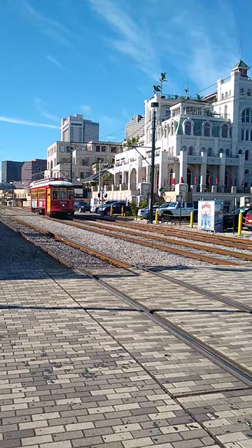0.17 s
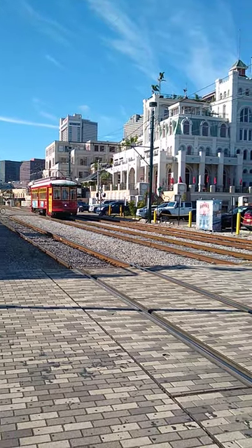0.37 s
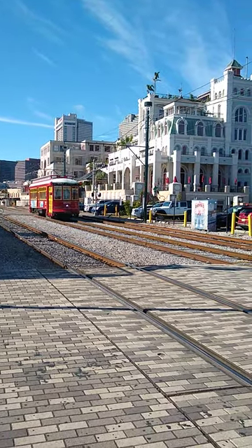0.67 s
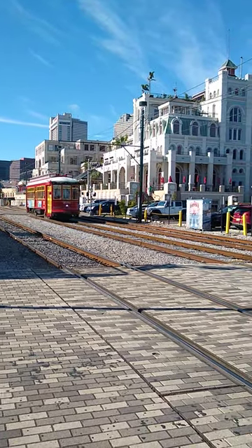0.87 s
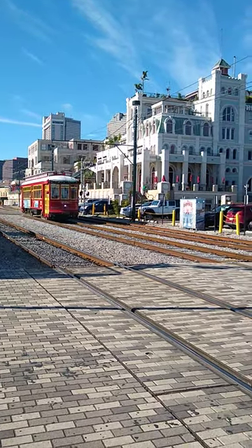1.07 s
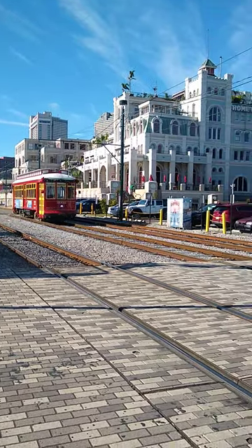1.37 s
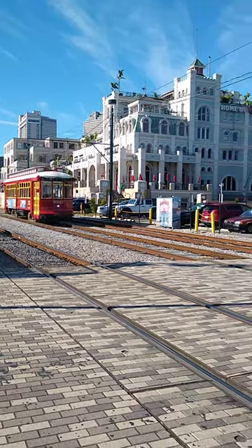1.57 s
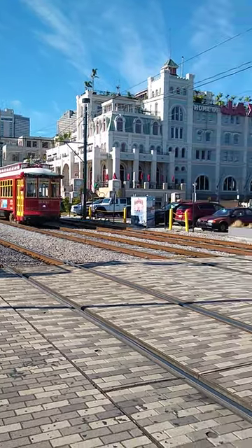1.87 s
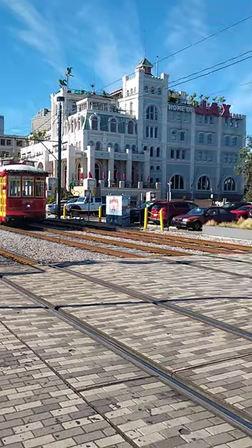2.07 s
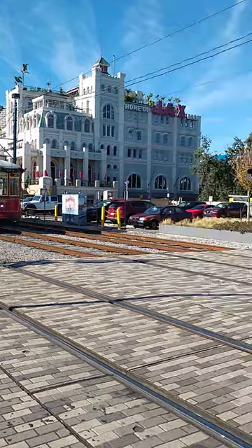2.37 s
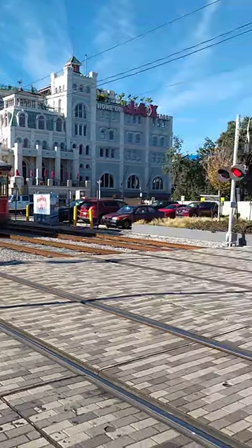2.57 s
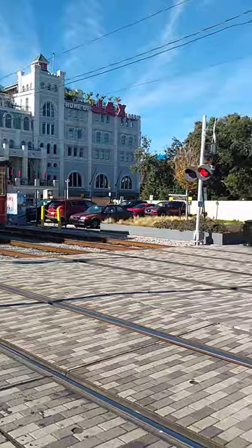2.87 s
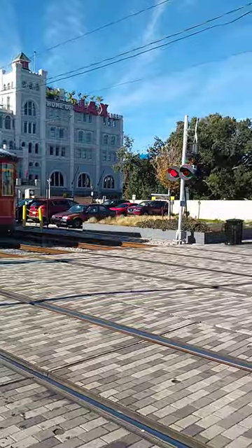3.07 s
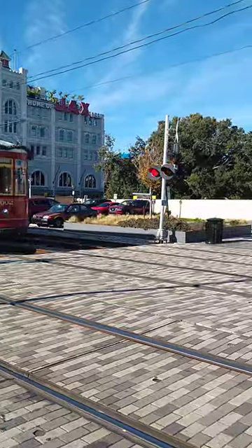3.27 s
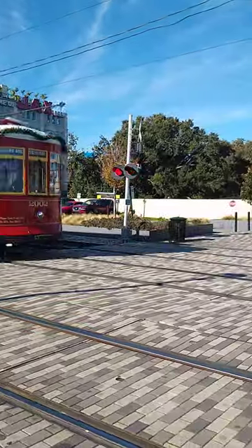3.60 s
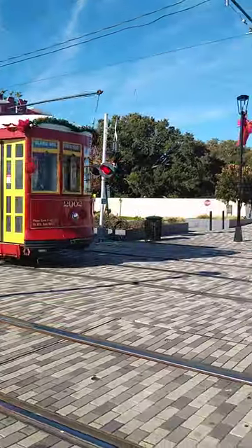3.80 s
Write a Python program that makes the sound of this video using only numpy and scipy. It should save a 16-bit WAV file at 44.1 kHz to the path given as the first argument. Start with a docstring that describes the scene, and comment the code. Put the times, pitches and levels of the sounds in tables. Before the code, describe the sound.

An approaching streetcar rolls and knocks over rail joints, its motor whining, amid gusty wind.

```python
"""At a street crossing, a streetcar rolls up and draws level, over the steady wash of the street.
Its wheels rumble on the rails, knock over joints, groan and briefly ring; loose metal clatters.
Its gears hum, its body drones, its motor whines and the rails sing ahead of it.
Wind buffets the two microphone openings (ports) of a hand-held camera, which gets one dull bump.
A thin hiss of air comes and goes."""
import sys
import numpy as np
from scipy import signal
from scipy.fft import rfft, irfft
from scipy.io import wavfile
from scipy.ndimage import uniform_filter1d, minimum_filter1d

SR = 44100
rng = np.random.default_rng(int(sys.argv[2]) if len(sys.argv) > 2 else 0)


def master(y):
    """Save y as 16-bit WAV."""
    cut = np.clip(np.atleast_2d(y).T, -1, 1)
    pcm = np.round(cut * 32767)  # scale
    wavfile.write(sys.argv[1], SR, pcm.astype(np.int16))


N = 173754
T = np.arange(N) / SR
HZ = np.fft.rfftfreq(N, 1 / SR)

# how the rolling grows as the car nears (time [s], level [dB])
APPROACH = [(0, -21.5), (1.0, -19), (1.7, -14.5), (2.2, -11.5), (2.7, -5.5), (3.12, -4.5), (3.4, -1),
            (3.94, 3)]
# sound of wheels on rails, close by (frequency [Hz], level [dB per Hz])
ROLLING = [(50, -82), (110, -64.5), (190, -48.5), (255, -44), (330, -40.5), (400, -47.5), (470, -46.5),
           (600, -45), (670, -51), (800, -48.5), (950, -58), (1270, -59.5), (1400, -61.5), (1600, -60),
           (2050, -67), (2550, -69.5), (2900, -77), (3350, -82), (3800, -78.5), (4400, -76), (5000, -87),
           (6800, -96.5), (9000, -101), (13000, -94.5), (15500, -99)]


def amp(db):
    """Turns decibels into a number to multiply by."""
    return 10 ** (np.asarray(db) / 20)


def unit(x):
    """Scales a signal to an average size (rms) of 1."""
    return x / np.sqrt(np.mean(x ** 2) + 1e-20)


def read(points):
    """Joins a table's points into a smooth line over frequency, spaced by octaves."""
    hz, value = np.transpose(points)
    return np.interp(np.log(HZ + 1), np.log(hz + 1), value)


def curve(points, column=1):
    """Follows one column of a table over time."""
    rows = np.array(points)
    return np.interp(T, rows[:, 0], rows[:, column])


def noise(db_per_hz):
    """Two unrelated noises with the given level at each frequency."""
    return irfft(rfft(rng.standard_normal((2, N))) * amp(db_per_hz), N) * np.sqrt(SR / 2)


def wander(rate_hz):
    """A random drift of size 1, up to about the given rate."""
    spectrum = rfft(rng.standard_normal(N))
    return unit(irfft(spectrum * HZ / (HZ + 3) / (1 + (HZ / rate_hz) ** 4), N))


def patchy(x, depth_db):
    """Lets random patches of low and high sound swell and sink."""
    slices = signal.stft(x, nperseg=512, noverlap=384)[2]
    patches = rng.standard_normal(slices.shape[:0:-1])  # time by frequency
    patches = uniform_filter1d(patches, size=16, axis=0)
    patches = unit(uniform_filter1d(patches, size=4, axis=1))
    return signal.istft(slices * amp(depth_db * patches.T), nperseg=512, noverlap=384)[1][:, :N]


def ring(hz, width_hz):
    """Noise of size 1 gathered around one pitch, like something rubbed until it rings."""
    return unit(noise(-20 * np.log10(1 + ((HZ - hz) / width_hz * 2) ** 2)))


def tone(hz, waver, flicker_db):
    """A tone of size 1 whose level flickers and whose pitch wavers by the given fraction."""
    phase = 2 * np.pi * np.cumsum(hz * (1 + waver * wander(rate_hz=20.2))) / SR
    return unit(amp(flicker_db * wander(rate_hz=19)) * np.sin(phase))


def blow(start, decay_s, attack_s):
    """The shape of a hit: a quick rise, then a fade."""
    age = np.maximum(T - start, 0)
    return np.minimum(age / attack_s, 1) * np.exp(-age / decay_s)


def swells(rows):
    """One smooth rise and fall for each row (start [s], length [s], level [dB])."""
    return sum(amp(db) * np.sin(np.pi * np.clip((T - start) / length, 0, 1)) for start, length, db in rows)


def street():
    """The street and the far track blend into a wash that slowly grows."""
    # colour of the wash (frequency [Hz], level [dB per Hz])
    colour = [(50, -77), (110, -63.5), (200, -59), (270, -52.5), (420, -73.5), (570, -70.5), (680, -71),
              (800, -66), (1000, -73.5), (1270, -68), (1450, -69), (1700, -71), (2050, -68.5), (2900, -88),
              (3350, -98), (3900, -84.5), (5000, -98), (7000, -106), (9500, -107), (12000, -105),
              (15500, -114)]
    # its rise (time [s], level [dB])
    loudness = [(0, -3), (.8, -1), (1.2, 1), (2.0, 1), (3.94, 5)]
    return patchy(noise(read(colour)), depth_db=2.0) * amp(curve(loudness))


def rolling(near_db):
    """Wheels rumble and judder along the rails."""
    judder_db = 1.5 * wander(rate_hz=38)
    return patchy(noise(read(ROLLING)), depth_db=1.46) * amp(near_db + judder_db - 2.5)


def gear_hum(near_db):
    """The gears rub out a rough hum at several pitches."""
    # gear notes (pitch [Hz], width [Hz], level when close [dB], share of the approach followed [0-1])
    notes = [(245, 42, -31.5, 0.6), (326, 55, -31, 0.54), (574, 45, -38, 0.68), (471, 53, -30.5, 1),
             (1020, 38, -43, 1)]
    return sum(ring(hz, width) * amp(db + share * near_db) for hz, width, db, share in notes)


def body_drone(near_db):
    """The car's body drones, higher and louder as it comes close."""
    # note of the body (time [s], pitch [Hz])
    pitch = [(0, 261.5), (1.9, 258), (2.5, 284), (3.35, 271.5), (3.6, 293.5), (3.94, 298)]
    return tone(curve(pitch), waver=0.055, flicker_db=2) * amp(-26 + 0.61 * near_db)


def singing_rails(near_db):
    """The rails sing ahead of the car."""
    # rail notes (pitch [Hz], level when close [dB], share of the approach followed [0-1])
    notes = [(799, -46, 0.25), (1254, -45.5, 0.17), (1290, -47.5, 0.098), (1492, -44.5, 0.51),
             (1680, -47, 0.1)]
    return sum(tone(hz, waver=0.009, flicker_db=4) * amp(db + share * near_db) for hz, db, share in notes)


def wind():
    """Lumpy wind and single gusts push the two ports in mostly opposite directions."""
    # strength of the wind (time [s], level [dB])
    strength = [(0, -16), (.2, -4), (.4, -11), (.66, -6.5), (.7, -24), (.75, -9.5), (.82, -24),
                (.96, -14.5), (1.3, -25.5), (1.42, -39), (1.64, -36), (1.75, -22), (1.95, -17.5),
                (2.24, -11.5), (2.5, -17), (2.65, -26), (3.0, -24), (3.4, -30), (3.66, -15), (3.94, -25)]
    # its low rumble (frequency [Hz], level [dB per Hz])
    rumble_colour = [(20, -60), (45, -40.5), (80, -39), (130, -34.5), (200, -42), (300, -58), (400, -62),
                     (600, -88), (1200, -110.5)]
    # single gusts (start [s], length [s], level [dB])
    gusts = [(.025, .025, -8), (0.172, 0.035, -4), (0.208, 0.08, -1), (0.29, .03, -6), (0.49, 0.06, -7),
             (2.391, 0.041, -4)]
    # their brighter sound (frequency [Hz], level [dB per Hz])
    gust_colour = [(20, -66), (45, -55), (80, -43), (130, -37), (200, -38), (330, -45), (450, -53),
                   (600, -65), (900, -81), (1500, -106)]
    # how closely one port mirrors the other (frequency [Hz], likeness [0-1])
    mirroring = [(90, .985), (170, .95), (280, .85), (450, .7)]
    force = amp(curve(strength) + 1.5 * wander(rate_hz=22.2) + 5.5)
    mirrored, common = rfft(noise(read(rumble_colour)) * force + noise(read(gust_colour)) * swells(gusts))
    likeness = np.clip(read(mirroring), 0, 1)
    mirrored = mirrored * np.sqrt((1 + likeness) / 2) * np.array([[1], [-1]])
    common = common * np.sqrt((1 - likeness) / 2)
    return irfft(mirrored + common, N) * amp([[0.93], [-0.93]])  # leans to the left


def hiss():
    """A thin, fluttering hiss of air comes and goes, with two short puffs."""
    # strength of the hiss (time [s], upper level [dB], lower level [dB])
    loudness = [(0, -26, -29), (.06, -16.5, -13), (.18, -9, -9), (.25, -17, -11), (.34, -10, -13),
                (.42, -11, -5), (.48, -27, -28), (1.55, -27, -57), (1.66, -11.5, -10), (1.78, 2.5, 1),
                (1.89, -2.5, -6.5), (2.03, 0.5, -1.5), (2.14, 1, -5), (2.26, 1, 5), (2.38, -15, -10),
                (2.67, -16, -21.5), (3.2, -12.5, -6.5), (3.94, -9, -27)]
    # upper hiss (frequency [Hz], level [dB per Hz])
    upper_colour = [(3000, -105), (7000, -120), (9800, -88.5), (10800, -84.5), (14000, -84), (15500, -87.5)]
    # lower hiss (frequency [Hz], level [dB per Hz])
    lower_colour = [(1500, -100), (3000, -82), (4000, -82), (4800, -84.5), (5500, -83.5), (6500, -86),
                    (8200, -87), (11000, -104), (15000, -108)]
    # puffs of air (start [s], length [s], level [dB])
    puffs = [(2.684, 0.18, -6.5), (2.961, 0.11, -5.5)]
    upper = noise(read(upper_colour)) * (amp(curve(loudness, column=1)) + swells(puffs))
    lower = noise(read(lower_colour)) * (amp(curve(loudness, column=2)) + swells(puffs))
    return patchy(upper + lower, depth_db=2.5) * amp(0.64 * wander(rate_hz=22))


def wind_thumps():
    """Each swirl of air gives one push, opposite at the two ports, that swings back as it leaks away."""
    # swirls (time [s], level [dB], half-width [s])
    swirls = [(.0475, 0, .0011), (.104, -4, .0008), (.1125, 4, .0014), (.184, -4, .0011), (.234, 1, .0012),
              (.2505, 1, .0009), (.279, -7, .0008), (.5, -2.5, .0008), (.518, -6, .001), (.533, 3, .0012),
              (.673, -5, .0015), (.741, -8, .0016)]
    push = sum(amp(db) * np.exp(-.5 * ((T - time) / width) ** 2) for time, db, width in swirls)
    swing = signal.sosfilt(signal.butter(3, 110, "high", fs=SR, output="sos"), push)
    return swing * np.array([[1], [-amp(-2.5)]])


def whistle():
    """The hissing air briefly whistles."""
    # whistles (start [s], length [s], level [dB])
    whistles = [(.33, 0.17, -68), (1.69, 0.042, -53), (1.76, 0.052, -48)]
    return ring(hz=5400, width_hz=220) * swells(whistles)


def bump():
    """One short, dull knock on the camera's body."""
    pitch_hz, width_hz = 616, 670
    push = rng.standard_normal((2, N)) * blow(start=0.536, decay_s=0.007, attack_s=0.00034)
    body = 1 / (1 + ((HZ - pitch_hz) / width_hz * 2) ** 4)
    return irfft(rfft(push) * body, N) * np.sqrt(SR / 2 / width_hz) * amp(-18)


def motor_whine():
    """The motor whines in surges at a nearly steady pitch."""
    # motor note (time [s], pitch [Hz], level [dB])
    note = [(0, 552, -77), (1.3, 553, -49.5), (1.75, 566, -38.5), (2.05, 550, -40), (2.33, 558, -32.5),
            (2.5, 562, -43), (3.0, 558, -41), (3.21, 567, -25.5), (3.35, 568, -46), (3.94, 565, -38)]
    return tone(curve(note, column=1), waver=0.005, flicker_db=1.8) * amp(curve(note, column=2))


def joint_knocks(near_db):
    """Wheels hit rail joints: each knock is a gritty burst plus a low note from the car's body."""
    # knocks (start [s], strength [dB], fade time [s], body pitch [Hz])
    hits = [(1.732, -4, .018, 322), (1.853, 2, .02, 248), (1.949, 3, 0.018, 250), (2.109, -1.5, 0.024, 284),
            (2.225, 3.5, 0.0086, 286), (2.346, -1.5, 0.024, 251), (2.48, 1, 0.018, 305),
            (2.681, 4, 0.013, 266), (2.833, -0.5, 0.028, 288), (2.99, -2.5, 0.025, 255),
            (3.184, -0.5, 0.034, 275), (3.392, 2, 0.045, 261), (3.45, -4, 0.027, 283),
            (3.519, 2, 0.027, 292.5), (3.598, -1, 0.037, 290.2), (3.718, 0.5, 0.033, 320)]
    grit = noise(read(ROLLING) - 10 * np.log10(1 + (HZ / 900) ** 2) - 3.5)  # duller than the rolling
    knocks = np.zeros((2, N))
    for start, db, decay, hz in hits:
        force = amp(db + 0.5 * near_db) * blow(start, decay, attack_s=0.0032)
        knocks += grit * force
        knocks[0] += amp(-12.5) * force * np.sin(2 * np.pi * hz * (T - start))
    return knocks


def clatter():
    """Loose metal rattles on the frame that holds the wheels."""
    # rattles (start [s], level [dB per Hz], fade time [s])
    hits = [(2.25, -65, 0.045), (2.669, -54.5, 0.016), (2.704, -59, 0.016), (2.721, -58, 0.011),
            (2.838, -60, .02), (3.19, -59, .025), (3.556, -55, .012), (3.735, -59, 0.05)]
    # colour of the metal (frequency [Hz], level [dB])
    colour = [(300, -14), (700, -2), (1200, -.5), (1700, -4), (2200, -20), (3000, -34), (8000, -58)]
    force = sum(amp(db) * blow(start, decay, attack_s=0.0045) for start, db, decay in hits)
    return noise(read(colour)) * force


def ticks():
    """A few faint, sharp ticks."""
    # ticks (start [s], level [dB per Hz])
    hits = [(2.523, -83), (2.570, -82), (3.192, -83)]
    return noise(0) * sum(amp(db) * blow(start, decay_s=0.0018, attack_s=0.00028) for start, db in hits)


def wheel_groan():
    """The wheels groan once on a wavering note."""
    return tone(hz=463, waver=0.012, flicker_db=1.5) * swells([(3.2, 0.26, -27.5)])


def wheel_ring():
    """Rough contact with the rail makes a wheel ring, high and brief."""
    return ring(hz=3740, width_hz=110) * swells([(3.495, 0.07, -49)])


def ports(pair):
    """Makes left and right from a pair: both ports share row 0, and row 1 makes them differ."""
    # how alike the ports sound (frequency [Hz], likeness [0-1])
    alike = [(100, 1), (300, 0.99), (500, 0.81), (700, .99), (1150, 1), (1500, 0.85), (2200, 0.99),
             (2600, 0.76), (3200, 0.31), (4000, 0.73), (4280, 1), (4600, 1), (4900, 0.22), (5500, 1),
             (6000, 0.83), (6500, 0.39), (15000, 0.43)]
    # how far the left wave runs ahead (frequency [Hz], lead [radians])
    lead = [(100, 0), (250, .05), (380, .55), (500, -.25), (1100, 0), (1400, -.3), (1750, -1.1), (2100, -3),
            (2650, -3.6), (3300, -5.3), (3750, -8.2), (4250, -9.35), (4600, -9.48), (4800, -9.8),
            (5000, -12.6), (6100, -12.5), (6500, -9.4), (7000, -9.4), (14400, 9.4), (15500, 11)]
    # which side is louder (frequency [Hz], left minus right [dB])
    balance = [(160, 0.5), (270, -2), (440, 5.5), (700, 0), (1250, 0.5), (2000, -2), (3300, 1.5),
               (5400, -2.5), (8800, 12), (11000, 7.5), (14500, 1.5)]
    likeness = np.clip(read(alike), 0, 1)
    shared = rfft(pair[0]) * np.sqrt((1 + likeness) / 2)
    apart = rfft(pair[1]) * np.sqrt((1 - likeness) / 2)
    turn = np.exp(1j * np.interp(HZ, *np.transpose(lead)))
    lean = amp(read(balance))
    left, right = (shared + apart) * lean, (shared - apart) / turn
    return irfft(np.array([left, right]) * np.sqrt(2 / (1 + lean ** 2)), N)


def scene():
    """The car, the street and the small sounds pass through the ports, with the wind on top."""
    near_db = curve(APPROACH)
    car = rolling(near_db) + gear_hum(near_db) + joint_knocks(near_db) + clatter() + wheel_ring()
    # the clear tones go in the shared row, so they come from one direction
    car[0] += body_drone(near_db) + motor_whine() + wheel_groan() + singing_rails(near_db)
    return ports(car + street() + hiss() + whistle() + ticks() + bump()) + wind() + wind_thumps()


def record(dry):
    """Cuts the deepest bass, gently turns down the loudest peaks and cuts the highest treble."""
    bass_hz, ceiling, treble_hz = 52, 0.85, 15550
    thin = signal.sosfilt(signal.butter(4, bass_hz, "high", fs=SR, output="sos"), dry)
    headroom = np.minimum(ceiling / (abs(thin).max(axis=0) + 1e-9), 1)
    held = thin * uniform_filter1d(minimum_filter1d(headroom, size=600), size=600)
    treble_cut = signal.firwin(511, treble_hz, window=("kaiser", 9), fs=SR)
    return signal.oaconvolve(held, treble_cut[None], "same")


dry = scene()
out = record(dry)
master(out)
```